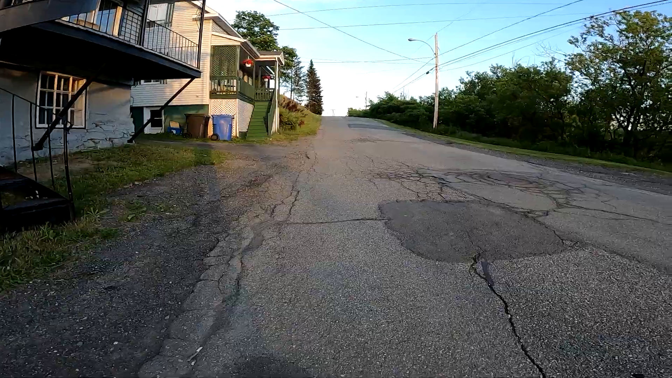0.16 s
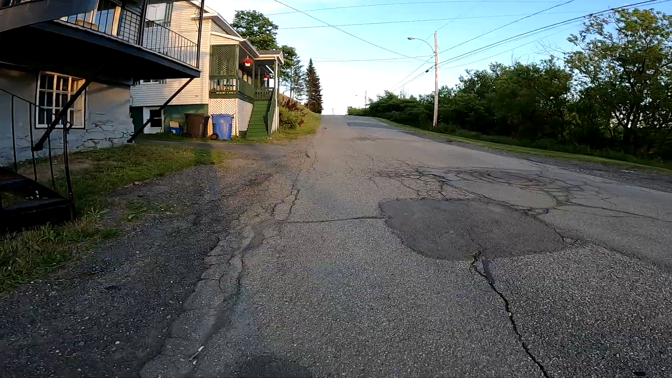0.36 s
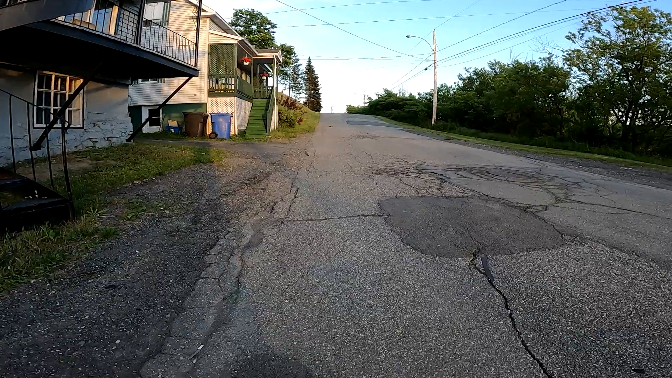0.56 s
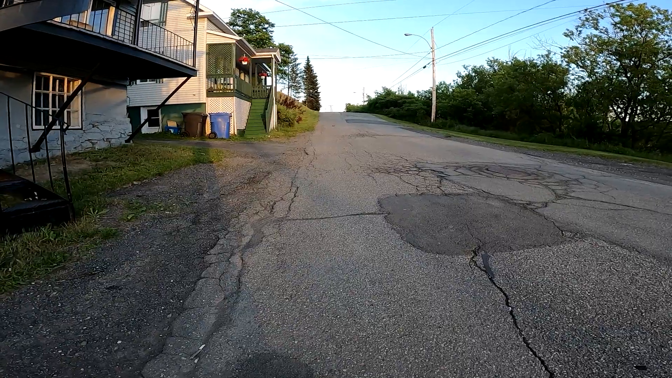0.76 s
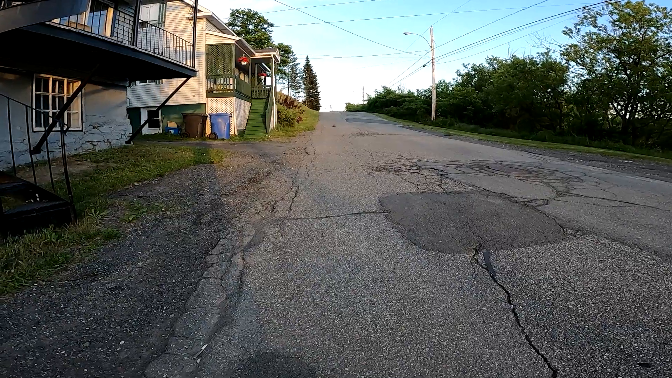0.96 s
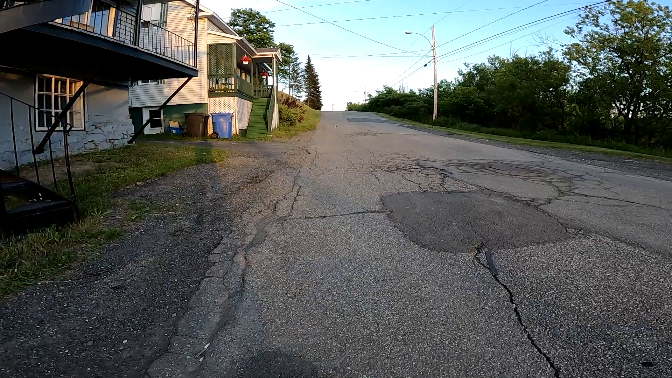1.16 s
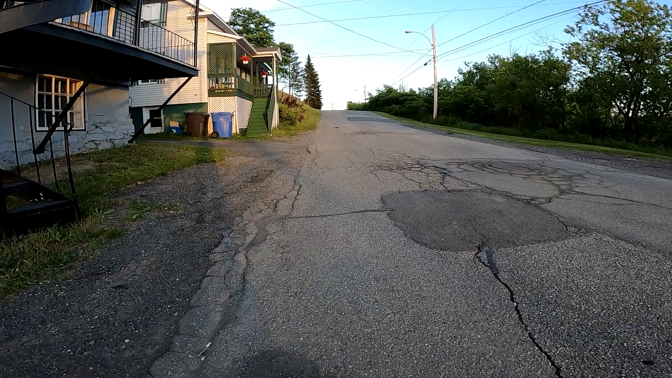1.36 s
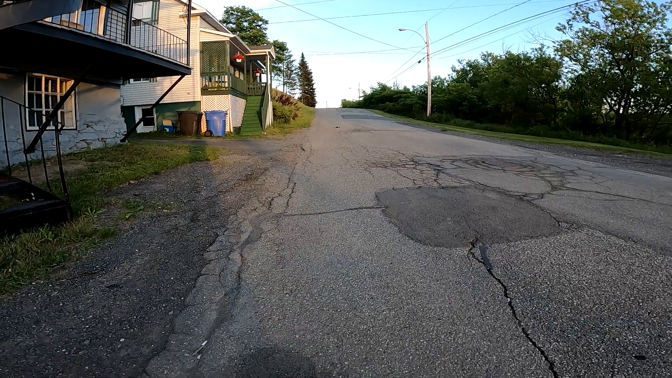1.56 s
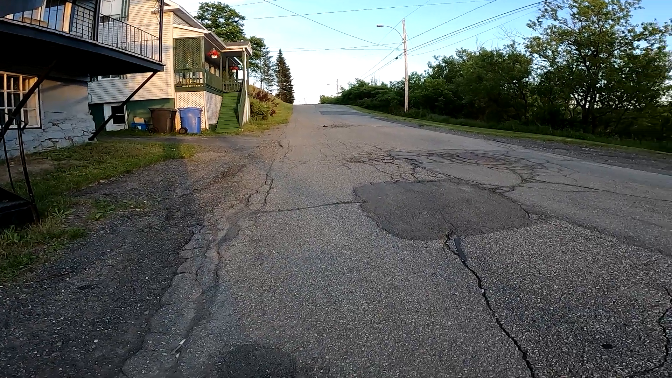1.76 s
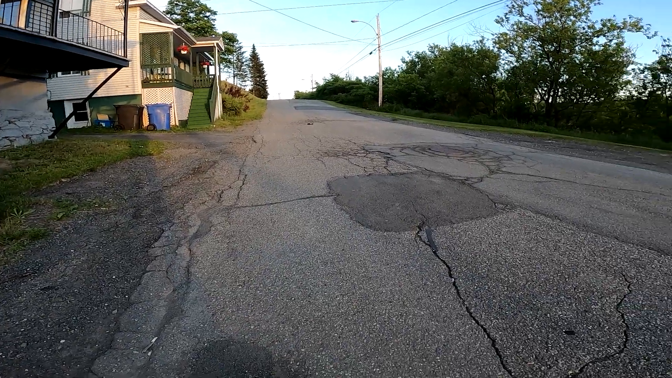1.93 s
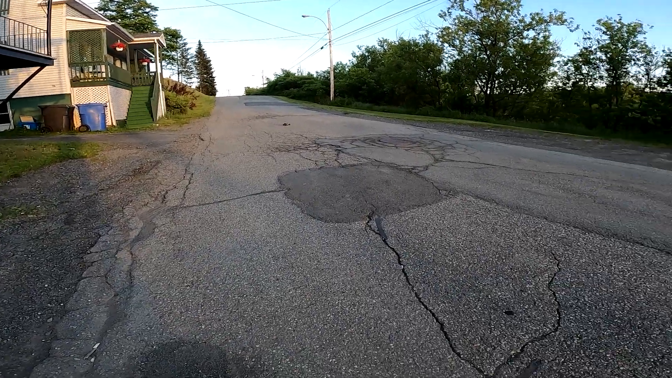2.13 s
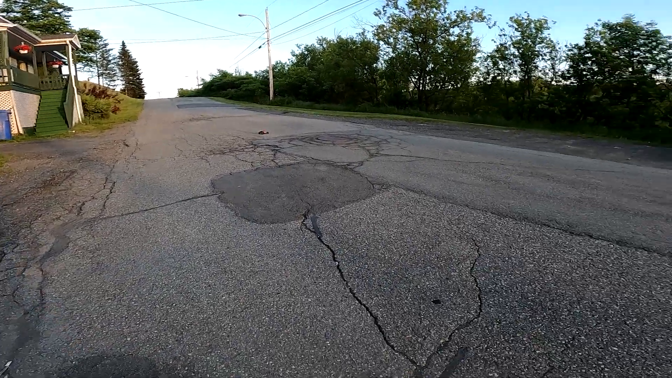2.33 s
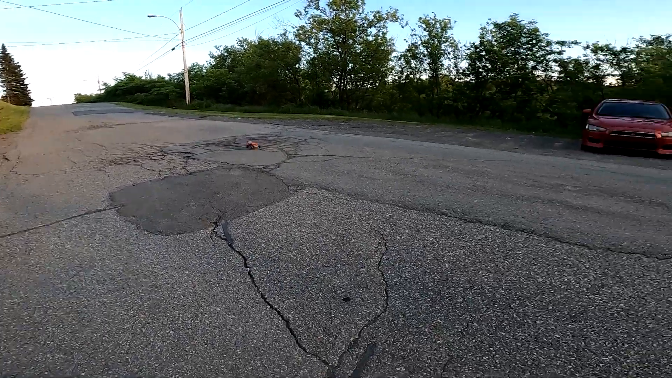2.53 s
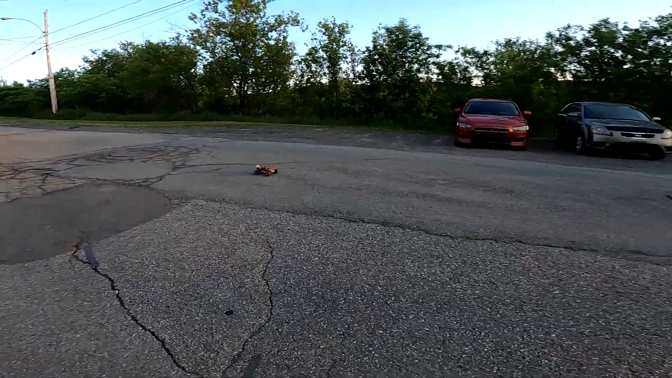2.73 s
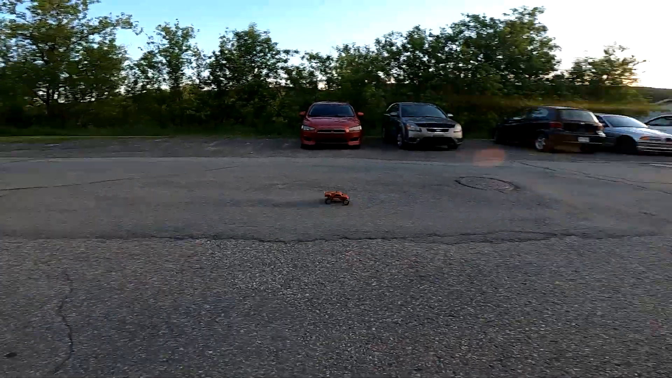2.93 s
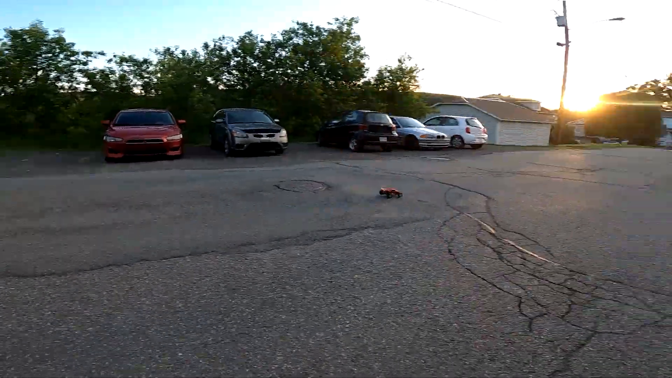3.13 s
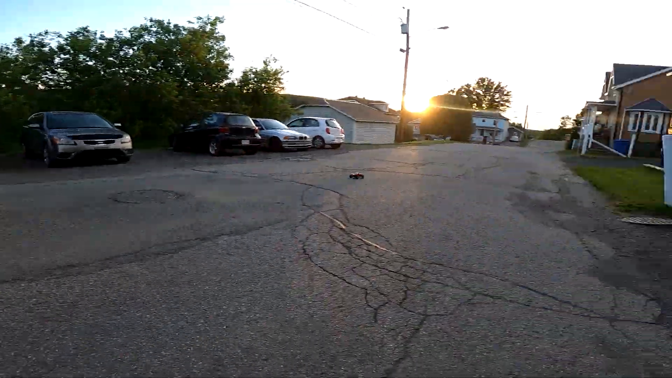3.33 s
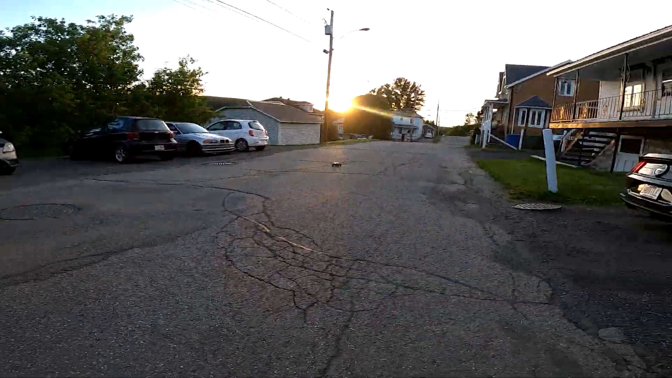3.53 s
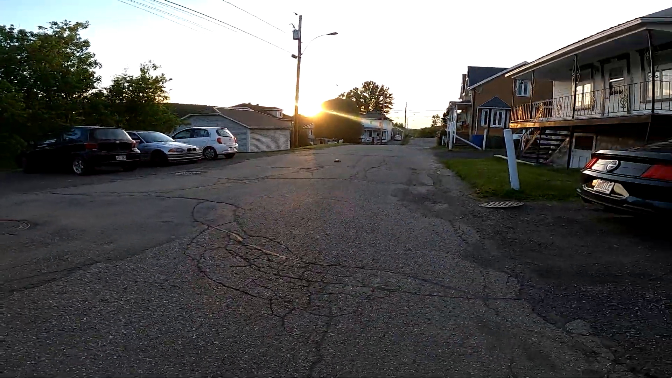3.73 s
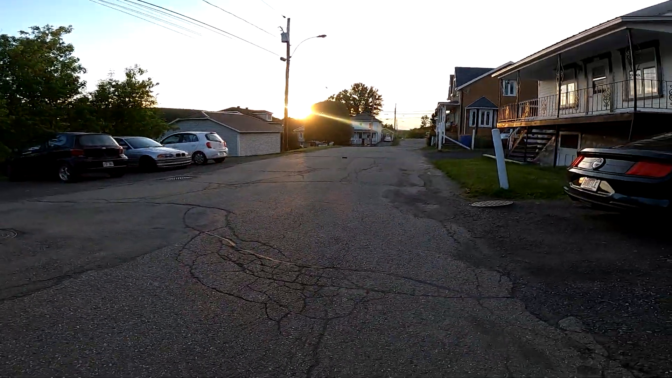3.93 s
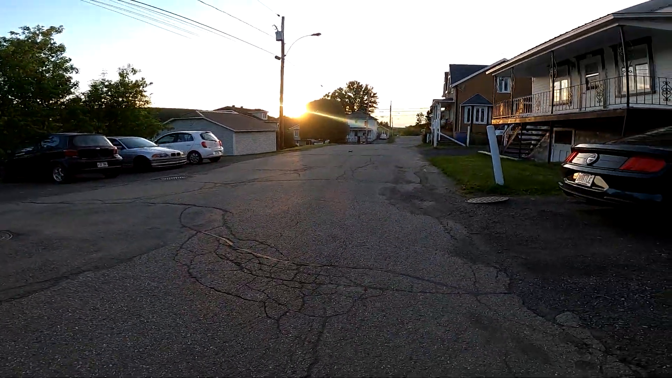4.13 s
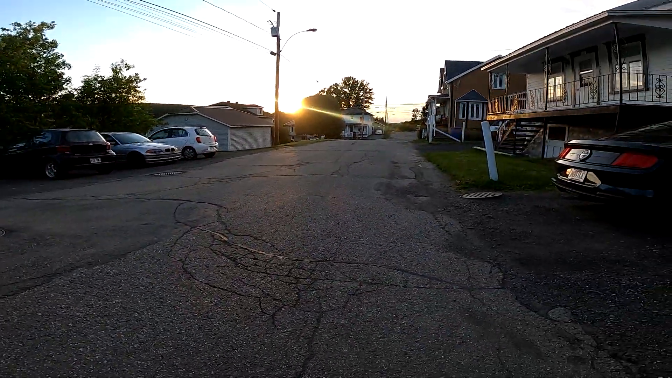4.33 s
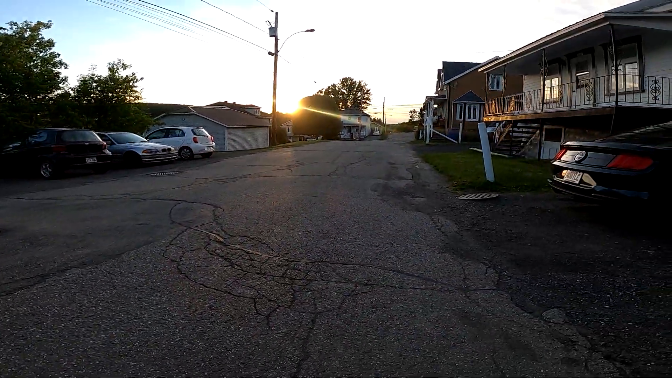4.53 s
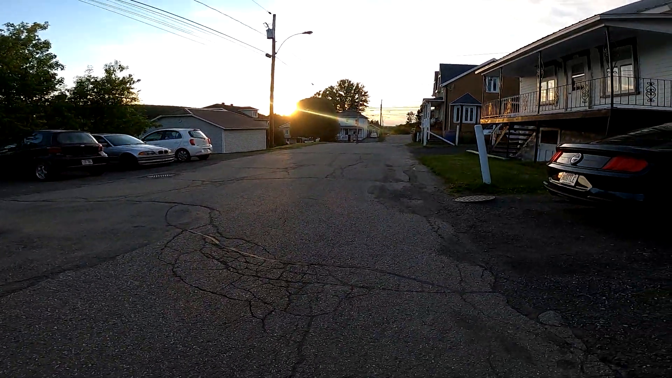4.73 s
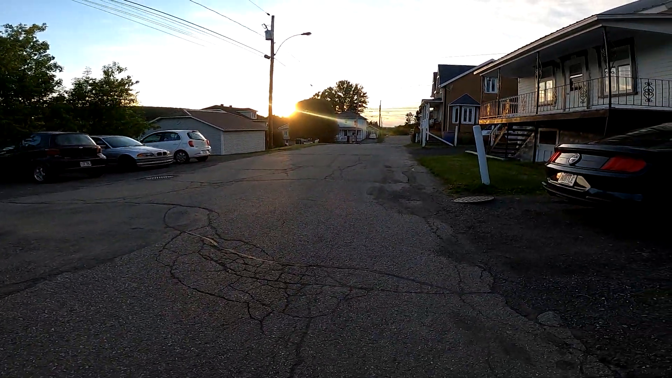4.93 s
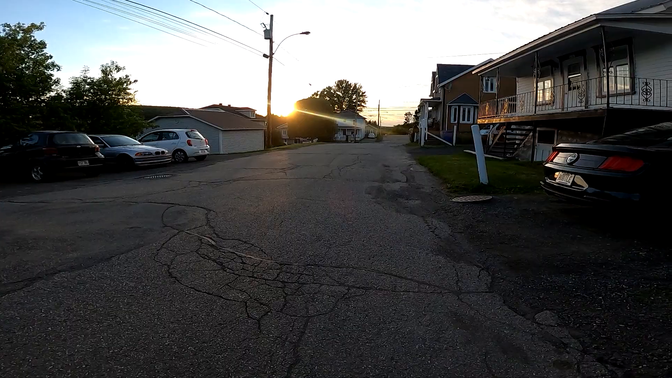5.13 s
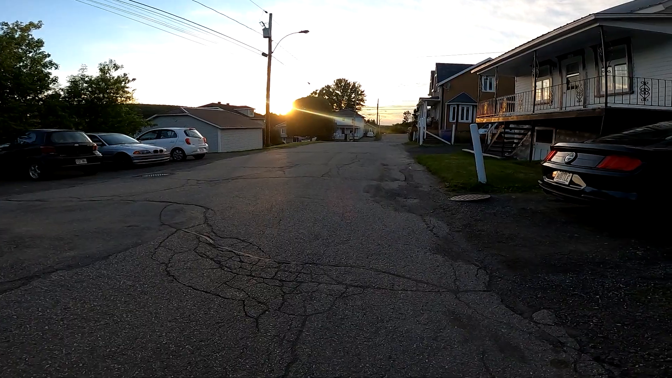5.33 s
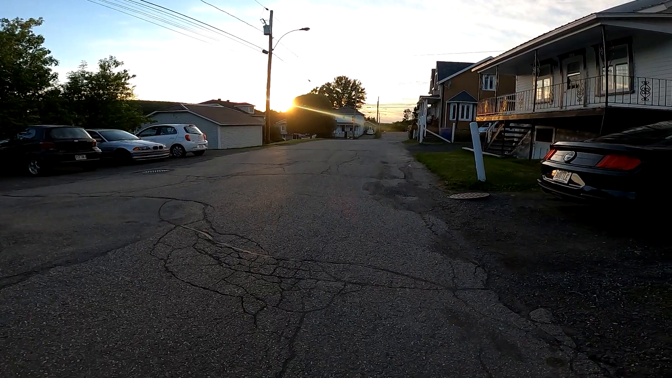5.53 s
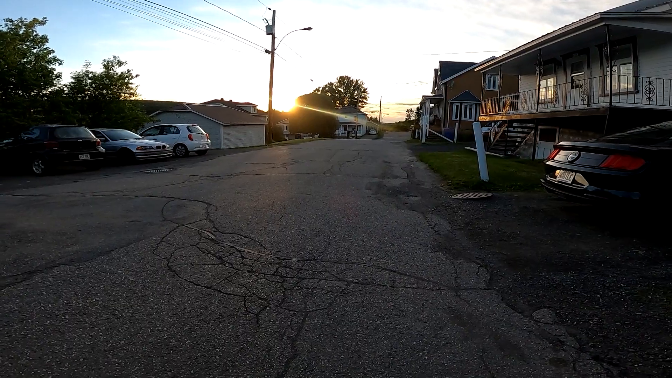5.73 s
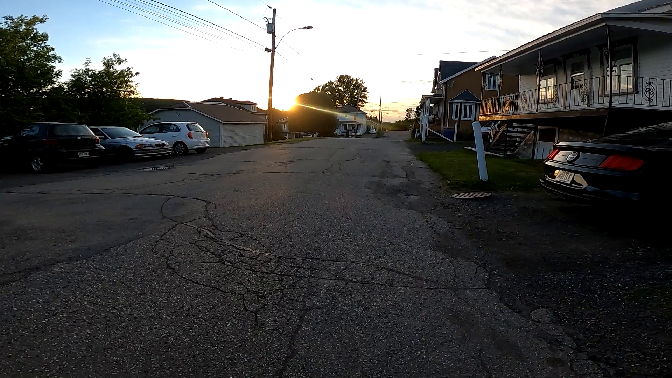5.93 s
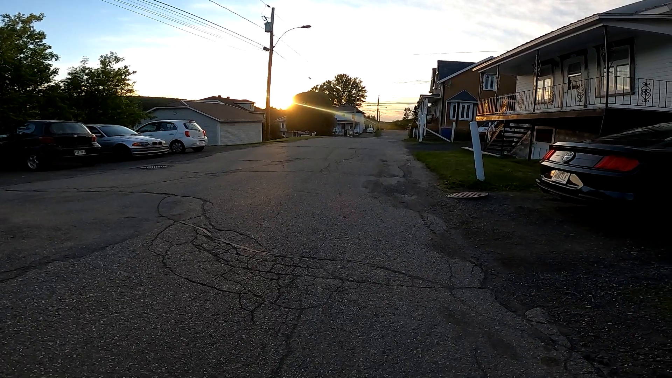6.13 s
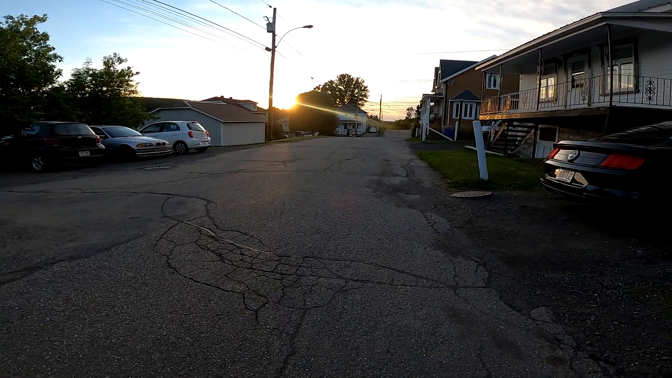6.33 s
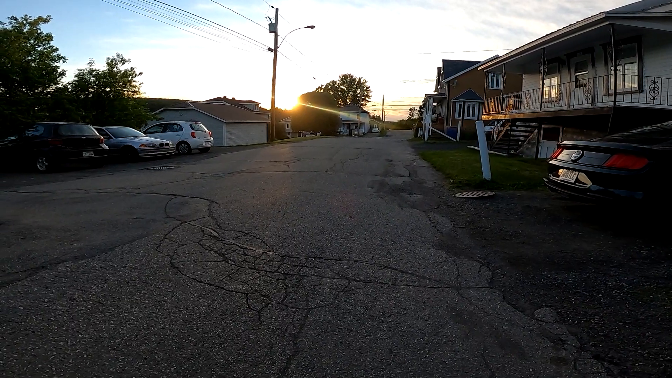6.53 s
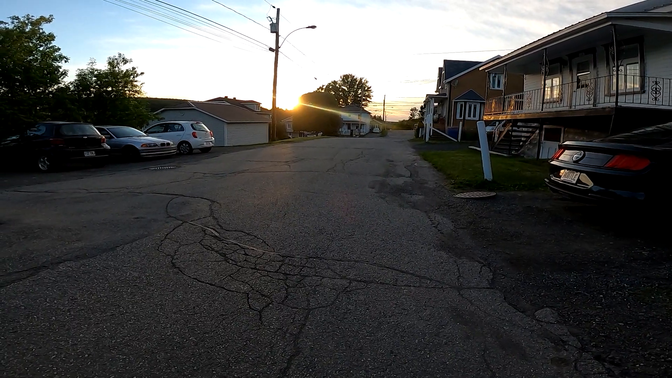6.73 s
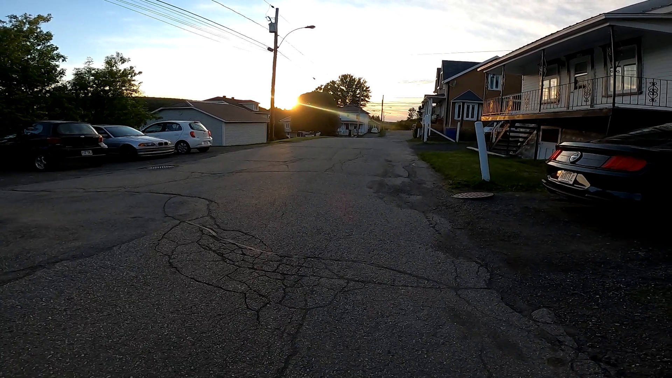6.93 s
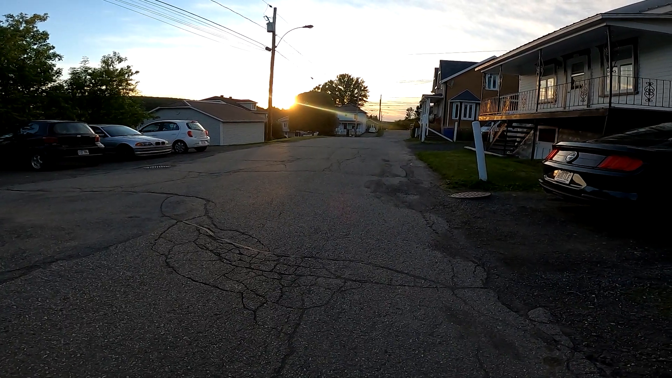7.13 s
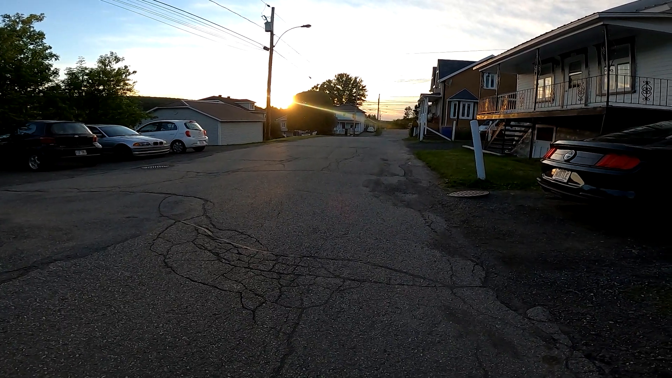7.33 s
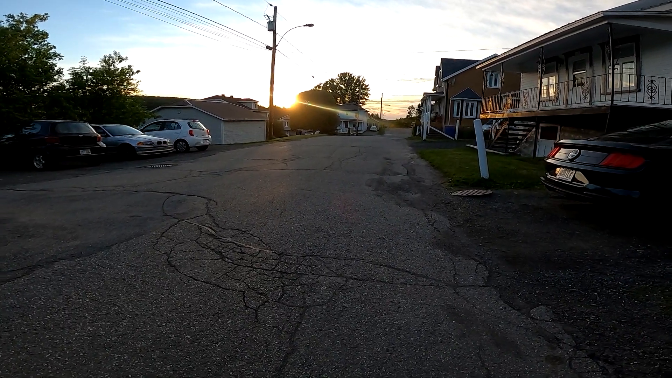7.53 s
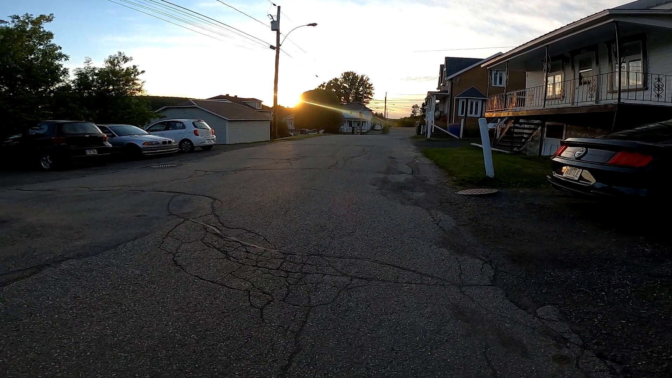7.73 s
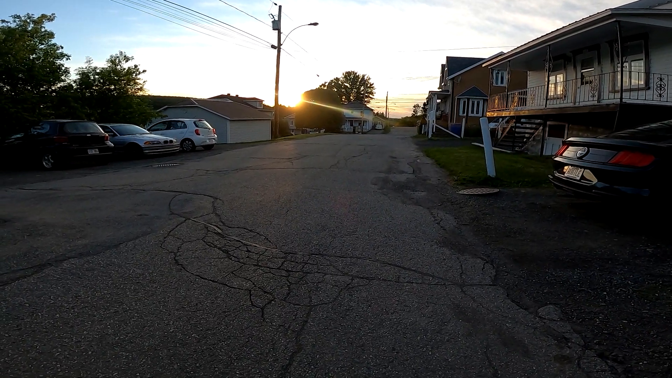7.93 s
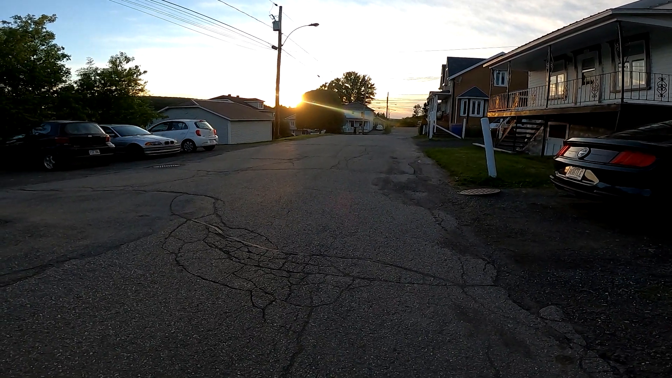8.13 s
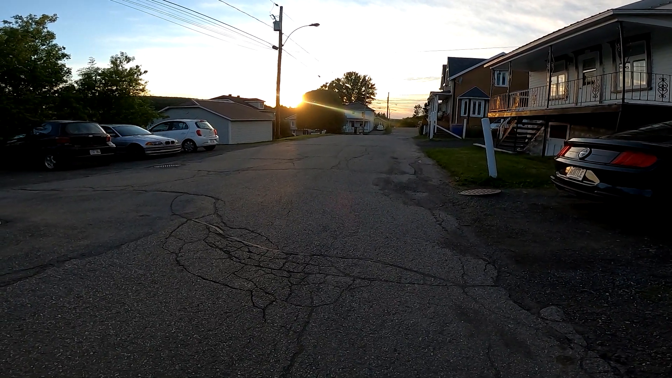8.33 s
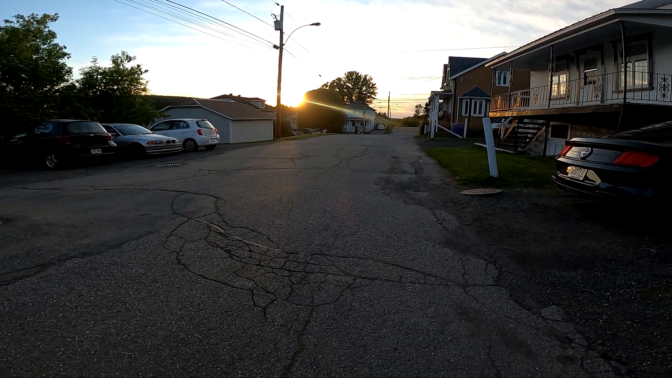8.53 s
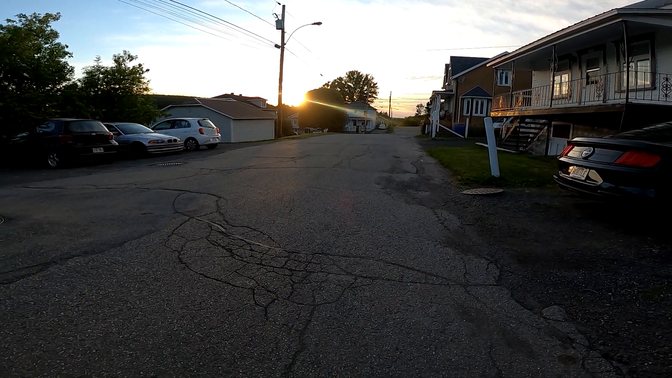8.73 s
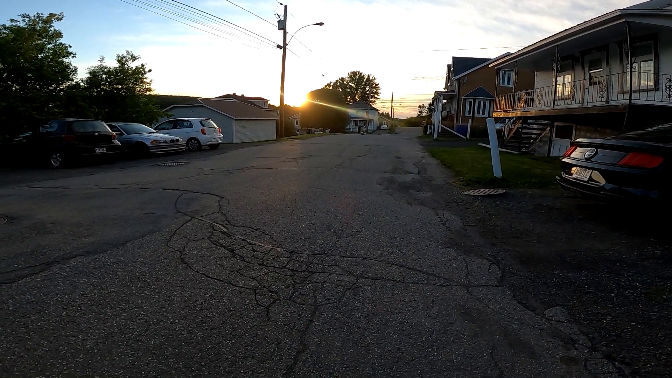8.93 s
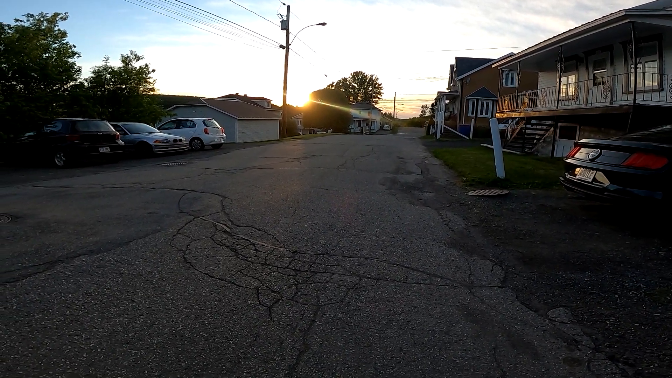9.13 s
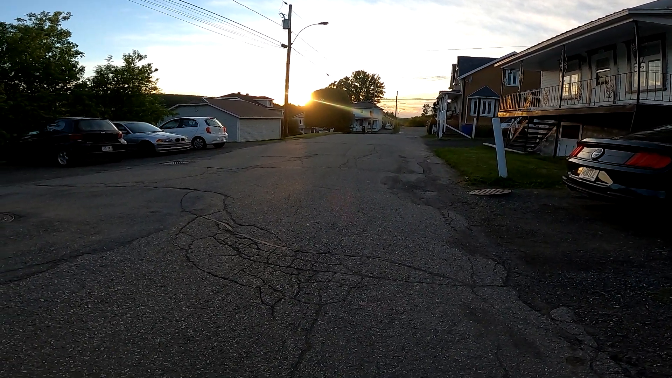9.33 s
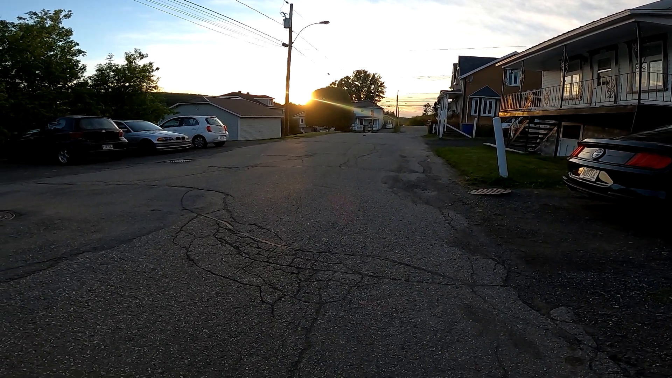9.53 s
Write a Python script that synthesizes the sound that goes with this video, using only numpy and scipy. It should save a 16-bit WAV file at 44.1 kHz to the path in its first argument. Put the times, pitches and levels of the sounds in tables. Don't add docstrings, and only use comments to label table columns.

```python
import sys
import numpy as np
from scipy import signal
from scipy.fft import rfft, irfft, next_fast_len
from scipy.io import wavfile
from scipy.ndimage import uniform_filter1d

SR = 44100
rng = np.random.default_rng(int(sys.argv[2]) if len(sys.argv) > 2 else 0)


def int16_out(signal):
    q = np.round(np.clip(np.atleast_2d(signal).T, -1, 1) * 32767)
    wavfile.write(sys.argv[1], SR, q.astype(np.int16))


def convert_level_to_amplitude(level_db):
    exponent = np.asarray(level_db, float) / 20
    return 10 ** exponent


N = 422919

# t/s, peak level/dB, f/Hz, t60/s
KNOCKS = [(2.781, -24, 1080, 0.044), (2.873, -26, 560, 0.071), (2.949, -22, 791, 0.05),
          (3.264, -11, 732, 0.045), (3.319, -30, 1030, 0.05), (3.469, -27, 977, 0.05),
          (4.359, -35, 1250, 0.05), (4.579, -34, 1370, 0.05), (5.128, -38, 1000, 0.059),
          (8.203, -44, 388, 0.05), (8.759, -50, 533, 0.05)]
# f/Hz, likeness/0..1
NEAR_SAME = [(60, 0.83), (180, 0.82), (550, 0.94), (1650, 0.83), (4970, 0.96), (15000, 0.28)]
# begins, full, fades, ends t/s
IN_VIEW = (1.4, 2.3, 5.3, 6.0)
# begins, full, fades, ends t/s
LEAVING = (2.7, 4.4, 5.8, 6.5)
LEAVING_PAN_DB = -0.9


def drivetrain():
    # factor on its pitch, width/Hz, level/dB
    shell = [(1.0, 170, 0), (.82, 380, -6)]
    gear_case = [(1.0, 215, 0.5), (.87, 600, -7), (1.17, 600, -8)]
    motor_can = [(1.0, 300, 0), (.955, 220, 0), (1.065, 450, -7.5)]
    # t/s, gear case f/Hz, main modes standing out level/dB
    heading = [(0, 3070, -2), (1.8, 3280, 7), (2.02, 3020, 1), (2.2, 3130, 4), (2.3, 3340, 5),
               (2.6, 3260, 8), (2.8, 3330, 6), (2.9, 3000, -2), (3.1, 3120, 7), (3.3, 2880, -4),
               (3.55, 2850, 1), (3.75, 3170, -1.5), (4.3, 3300, 0), (4.5, 3260, -6), (5.1, 3240, -5),
               (5.8, 2950, -2), (7.0, 3200, 1), (9.59, 3220, 0)]
    # begins, full, fades, ends t/s
    rushing = (1.9, 2.45, 2.62, 2.78)
    gear_mean_hz, shell_mean_hz, can_mean_hz = 3250, 1600, 5965
    tilt_db = 7

    hz, t = grid(size=512)
    away = spell(t, LEAVING)
    _, load_db, shell_db = truck(t)
    gear_hz, focus_db = columns(heading, t)
    wander = evened(smooth_twice(rng.standard_normal(len(t)), 12))
    gear_hz = gear_hz * (1 + 0.012 * wander)
    shell_hz = shell_mean_hz * (gear_hz / gear_mean_hz) ** 0.27
    can_hz = can_mean_hz * (gear_hz / gear_mean_hz) ** 0.1
    can_hz = can_hz * (1 - 0.036 * away + 0.035 * spell(t, rushing))
    can_db = -48.5 + 0.97 * (load_db + 40) - spell(t, IN_VIEW)

    parts = [(shell, shell_hz, load_db + shell_db, -62, 0.4),
             (gear_case, gear_hz, load_db, -72, 1),
             (motor_can, can_hz, can_db, -78, 0.3)]
    power = 0
    for modes, pitch, db, street_db, aim in parts:
        rings = []
        for factor, width, mode_db in modes:
            gain = convert_level_to_amplitude(2 * (mode_db + tilt_db * (factor - 1) * away))
            rings.append(gain / (1 + (2 * (hz - factor * pitch) / width) ** 2) ** 2)
        main, *others = rings
        power = power + unit(main * convert_level_to_amplitude(2 * aim * focus_db) + sum(others)) * above(db, street_db)

    small_modes = patches(hz, t, 2, 90)
    uneven_db = 1.86 * patches(hz, t, 5, 20) + 0.53 * small_modes
    power = power * convert_level_to_amplitude(2 * (-1.8 + skips_db(hz, t) + uneven_db))
    teeth = clatter(260, 2.3, 0.0024, steady=2.3)
    return ports(teeth, power, NEAR_SAME, 512, LEAVING_PAN_DB * away)


def tyres():
    # f/Hz, level/dB per Hz
    thump = [(100, -58), (200, -25.5), (330, -6), (480, 0.5), (700, -0.5), (1000, 4.5), (1300, -15.5),
             (1800, -22), (3000, -91.5)]
    roar = [(300, -77), (700, -40), (1200, -8), (2200, -2), (3500, -5.5), (4500, -8), (5200, -14),
            (6500, -15), (7500, -31.5), (12000, -99)]
    grit = [(2000, -78), (5000, -4), (7200, -1), (8700, -5.5), (9500, -11), (11500, -15), (14000, -21.5),
            (15500, -31.5), (17000, -68.5)]

    hz, t = grid(size=512)
    roar_db, seen = truck(t)[0], spell(t, IN_VIEW)
    shake_db, shake_s = 5, 0.024
    shaken = sum(np.exp(-((t - s) / shake_s) ** 2) for s, *_ in KNOCKS)
    near_thump_db = -42.5 + 0.85 * (roar_db + 40.5) + shake_db * shaken
    far_thump_db = -54 + 0.22 * (roar_db + 45.5)
    thump_db = seen * near_thump_db + (1 - seen) * far_thump_db
    grit_db = roar_db - 11.5 - (1 - seen) * (6 - 0.36 * (roar_db + 43))

    power = unit(convert_level_to_amplitude(2 * read(thump, hz))) * above(thump_db, -57.0)
    power += unit(convert_level_to_amplitude(2 * read(roar, hz))) * above(roar_db, -70.0) * convert_level_to_amplitude(2 * 4.83)
    power += unit(convert_level_to_amplitude(2 * read(grit, hz))) * above(grit_db, -96.5) * convert_level_to_amplitude(2 * 4.0)
    jolts = evened(uniform_filter1d(rng.standard_normal(len(t)), 14))
    uneven_db = 1.2 * patches(hz, t, 8, 16) + 2.0 * patches(hz, t, 2, 70) + 0.6 * jolts
    power *= convert_level_to_amplitude(2 * (skips_db(hz, t) + uneven_db))
    stones = clatter(600, 0.92, 0.00053, steady=2.3)
    return ports(stones, power, NEAR_SAME, 512, LEAVING_PAN_DB * spell(t, LEAVING))


def knocks():
    out, t = np.zeros(N), np.arange(4000) / SR
    puffs = rng.standard_normal((len(KNOCKS), 4000))
    for (s, db, hz, t60), puff in zip(KNOCKS, puffs):
        ring = evened(resonate(resonate(puff, hz, 800), hz, 800))
        rise = np.minimum(t / 0.006, 1)
        out[round(s * SR):][:4000] += ring * convert_level_to_amplitude(db - 3 - 60 * t / t60) * rise
    return out


def whistle():
    # t/s, length/s, climb to the ceiling/s, bend of the climb, level/dB
    starts = [
        (.11, 1.19, .405, 1.75, -54.5),
        (6.565, .14, .2, 3, -48),
        (7.745, .3, .354, 3.2, -53),
    ]
    # f/Hz, level/dB
    casing = [(2900, -1), (3250, -2), (4050, -7), (4700, -22), (6030, -6), (6800, -14), (9000, -13),
              (9600, -34)]
    idle_hz, ceiling_hz, settle_hz, settle_s = 2945, 6030, 120, 0.012
    rise_s, fall_s, fade_db_per_s, octave_db = 0.04, 0.04, 6, -18

    out = np.zeros(N)
    for start, length, climb, bend, db in starts:
        u = np.arange(round(length * SR)) / SR
        hz = idle_hz + settle_hz * np.exp(-u / settle_s)
        hz = hz + (ceiling_hz - idle_hz) * np.minimum(u / climb, 1) ** bend
        waver = evened(smooth_twice(rng.standard_normal((2, len(u))), 200))
        turn = 2 * np.pi * np.cumsum(hz * (1 + 0.007 * waver[0])) / SR
        tone = convert_level_to_amplitude(read(casing, hz)) * np.sin(turn)
        tone += convert_level_to_amplitude(octave_db + read(casing, 2 * hz)) * np.sin(2 * turn)
        shape = np.clip(np.minimum(u / rise_s, (length - u) / fall_s), 0, 1)
        level = np.sqrt(2) * convert_level_to_amplitude(db - fade_db_per_s * u + 3.5 * waver[1])
        out[round(start * SR):][:len(u)] = level * tone * shape
    return out


def truck(t):
    # t/s, rolling level/dB, motor load level/dB, shell turned to us level/dB
    run = [(0, -69.5, -82, 5), (.16, -68, -65, 13), (.6, -58, -55, 6.5), (1.3, -51, -49.5, -4),
           (1.43, -47.5, -46, -2), (2.25, -41.5, -29.5, -2.5), (2.6, -37, -24.5, -8.5),
           (3.08, -32.5, -25.5, 2.5), (3.5, -36.5, -25, -7.5), (4.33, -43, -35, -3.5),
           (4.4, -47.5, -38.5, -6.5), (5.06, -52.5, -42.5, -8), (5.13, -54.5, -51.5, -5),
           (5.6, -61, -59, 6.5), (6.5, -65.5, -71, 7), (7.72, -73, -75, -3.5), (7.95, -64.5, -60.5, 2),
           (9.59, -45.5, -43.5, -17)]
    # start t/s, end t/s, rolling level/dB, load level/dB, shell level/dB
    throttle = [
        (2.671, 2.771, -5, -7.5, 2.5),
        (2.853, 2.993, -2.5, -9.5, 6),
        (3.15, 3.453, -2.5, -10, 5.5),
        (5.908, 6.55, -3, -1.5, 2),
        (6.606, 7.026, 7, 16, 4.5),
        (8.15, 8.494, -2, -4, 3.5),
        (8.578, 9.188, -1, -2, 2),
    ]
    edge = 0.034
    moves = 0
    for a, b, *db in throttle:
        moves = moves + np.outer(db, spell(t, [a - edge, a + edge, b - edge, b + edge]))
    return np.array(columns(run, t)) + moves


def skips_db(hz, t):
    # t/s, length/s, depth level/dB
    dips = [
        (5.095, .02, 7),
        (5.18, .02, 12),
        (5.275, .032, 16),
        (5.375, .032, 14),
        (5.47, .018, 6),
        (5.585, .02, 4),
    ]
    depth = sum(db * np.exp(-((t - s) / length) ** 2) for s, length, db in dips)
    return -np.clip(hz / 7000, 0.15, 1.2) * depth


def wind():
    # f/Hz, level/dB per Hz
    push_spectrum = [(10, 2), (25, 8.5), (60, 7), (100, -3.5), (200, -20.5), (400, -49), (1000, -120)]
    # t/s, half length/s, level/dB, left-right level/dB
    gusts = [(0.134, .08, -34, 15), (2.5, 0.14, -46, -22), (3.04, 0.19, -28.5, 5), (3.395, 0.18, -39.5, 6),
             (7.296, .4, -50, -5), (7.91, 0.17, -41, 0), (8.13, 0.22, -36, 0), (8.398, .15, -40, -1),
             (8.86, 0.044, -38, -1), (9.206, 0.043, -28, -1), (9.6, 0.16, -39.5, -6)]
    # t/s, peak level/dB, f/Hz, left-right level/dB
    buffets = [(0.126, -29, 45.3, 10.5), (2.431, -30.5, 40, -12), (2.584, -26.5, 55, -7),
               (2.632, -30, 50, -8), (2.924, -29, 49.7, -16), (2.946, -27.5, 54, 22),
               (2.999, -26, 73.4, 21), (3.085, -21.5, 61.7, 26.5), (3.104, -19, 59.6, 4),
               (3.121, -22, 73, 18), (3.214, -20, 57, 15), (7.913, -28, 49.5, -12), (8.08, -30, 49.3, 2),
               (8.113, -25.5, 50.3, 23), (8.209, -27, 48.6, -12), (8.411, -28.5, 39.6, 13),
               (9.191, -28.5, 40, -6)]
    breeze_db = -58

    t, sides = np.arange(0, N, 64) / SR, np.array([[1], [-1]])
    power = convert_level_to_amplitude(2 * breeze_db)
    for s, half, db, pan_db in gusts:
        power = power + convert_level_to_amplitude(2 * db + sides * pan_db) * np.exp(-2 * ((t - s) / half) ** 2)
    level = np.sqrt(np.repeat(power, 64, axis=1)[:, :N])

    size = next_fast_len(N)
    colour = convert_level_to_amplitude(read(push_spectrum, np.fft.rfftfreq(size, 1 / SR)))
    push = irfft(rfft(rng.standard_normal((2, size))) * colour, size)[:, :N]
    lumps = evened(smooth_twice(rng.standard_normal((2, N)), 1500))
    out = evened(push * convert_level_to_amplitude(1.1 * lumps)) * level
    for s, peak_db, hz, side_db in buffets:
        cycles = np.arange(-2000, 2000) / SR * hz
        shove = -(np.sin(2 * np.pi * cycles) + 0.48 * np.sin(2 * np.pi * 2.85 * cycles))
        shove = shove * np.exp(-(cycles / 0.48) ** 2)
        out[:, round(s * SR) - 2000:][:, :4000] += shove * convert_level_to_amplitude(peak_db - 1.5 + sides * side_db / 2)
    return out


def bird():
    # t/s, peak level/dB, f/Hz
    pips = [(5.9294, -70, 4500), (6.0207, -68, 4530), (6.119, -61, 4430), (6.2073, -65, 4570),
            (6.3061, -63, 4440), (6.3994, -66, 4350), (6.5056, -67, 4550), (6.6019, -65, 4460),
            (6.6982, -60, 4400), (6.7974, -60, 4480), (6.8877, -62, 4480), (7.0045, -60, 4390),
            (7.1018, -65, 4380), (7.211, -63, 4370)]
    last_note = 7.385, -56, 2120
    out, t = np.zeros(N), np.arange(900) / SR
    for s, db, hz in pips:
        turn = 2 * np.pi * hz * t * (1.02 - 1.2 * t)
        pip = np.sin(turn) + convert_level_to_amplitude(5) * np.sin(turn / 2)
        out[round(s * SR):][:900] += convert_level_to_amplitude(db - 1.5) * pip * np.hanning(900)
    s, db, hz = last_note
    out[round(s * SR):][:900] += convert_level_to_amplitude(db) * np.sin(2 * np.pi * hz * t) * np.hanning(900)
    echoes = [(0.019, -10), (0.041, -9), (0.062, -11), (0.081, -13)]  # delay/s, level/dB
    return out + sum(convert_level_to_amplitude(db) * np.roll(out, round(s * SR)) for s, db in echoes)


def engines():
    # start t/s, end t/s, first f/Hz, last f/Hz, level/dB
    hums = [(-1.5, 6.5, 142, 141, -44), (1.0, 2.5, 68, 70, -50), (3.4, 5.7, 67, 63, -41.5),
            (6.3, 9.4, 65, 55, -46), (1.1, 2.6, 204, 208, -47), (4.0, 5.8, 206, 194, -49),
            (4.4, 5.2, 230, 220, -50), (5, 7.36, 128, 117, -45.5), (6.9, 10.5, 177, 171, -45.5),
            (3.6, 4.6, 98, 102, -50), (9.1, 10.5, 121, 119, -46), (8.6, 10.5, 142, 142, -50)]
    waver_hz, steadiest_hz = 1.8, 142
    out, slow = np.zeros(N), np.linspace(0, N / SR, num=960)
    chances = rng.standard_normal((len(hums), 2, 960))
    for (t0, t1, first_hz, last_hz, db), chance in zip(hums, chances):
        span = np.arange(max(round(t0 * SR), 0), min(round(t1 * SR), N))
        t = span / SR
        drift, swell = (np.interp(t, slow, evened(c)) for c in uniform_filter1d(chance, 8))
        waver = 0.7 + waver_hz * abs(np.log2(first_hz / steadiest_hz))
        hz = np.interp(t, [t0, t1], [first_hz, last_hz]) + waver * drift
        fade = np.clip(np.minimum(t - t0, t1 - t) / 0.28, 0, 1)
        tone = np.sin(2 * np.pi * np.cumsum(hz) / SR)
        out[span] += np.sqrt(2) * convert_level_to_amplitude(db + 1.53 * swell) * fade * tone
    return out


def town():
    # f/Hz, level/dB per Hz
    wash = [(15, -17.5), (40, -11), (65, -1), (100, -5), (190, -4.5), (250, -12), (330, -23), (480, -23.5),
            (720, -33), (1100, -23.5), (1700, -31), (2500, -41.5), (6000, -58), (9000, -65.5),
            (16000, -110)]
    # f/Hz, likeness/0..1
    far_same = [(60, 0.96), (180, 1), (550, 0.81), (1650, 0.49), (4970, 0.31), (15000, 0.21)]
    hz, t = grid(size=2048)
    power = unit(convert_level_to_amplitude(2 * read(wash, hz))) * convert_level_to_amplitude(2 * (-40 + 1.6 * patches(hz, t, 12, 20)))
    return ports(rng.standard_normal((2, N)), power, far_same, 2048, -1.2)


def evened(x):
    return x / np.sqrt(np.mean(x ** 2) + 1e-20)


def smooth_twice(x, size):
    return uniform_filter1d(uniform_filter1d(x, size), size)


def read(points, hz):
    f, value = np.transpose(points)
    return np.interp(np.log(hz + 1), np.log(f + 1), value)


def columns(rows, t):
    s, *rest = np.transpose(rows)
    return [np.interp(t, s, c) for c in rest]


def spell(t, times):
    return np.interp(t, times, [0, 1, 1, 0])


def above(db, floor_db):
    return np.maximum(convert_level_to_amplitude(2 * db) - convert_level_to_amplitude(2 * floor_db), convert_level_to_amplitude(2 * (db - 8.5)))


def unit(power):
    return power / power.sum(0)


def resonate(x, hz, width):
    turn = np.exp(2j * np.pi * np.cumsum(hz * np.ones(len(x))) / SR)
    r = np.exp(-np.pi * width / SR)
    return 2 * (turn * signal.lfilter([1 - r], [1, -r], x / turn + 1e-18)).real


def grid(size):
    hop = size // 4
    return np.fft.rfftfreq(size, 1 / SR)[:, None], np.arange(-(-N // hop) + 1) * hop / SR


def patches(hz, t, bins, frames):
    chance = rng.standard_normal((len(t), len(hz))).T
    return evened(uniform_filter1d(uniform_filter1d(chance, bins, 0), frames, 1))


def clatter(per_s, spread_db, burst_s, steady):
    strikes = convert_level_to_amplitude(spread_db * np.minimum(rng.exponential(1, N), 4)) * (rng.random(N) < per_s / SR)
    bursts = evened(signal.lfilter([1], [1, -np.exp(-1 / (burst_s * SR))], strikes))
    return evened((steady + bursts) * rng.standard_normal((2, N)))


def ports(drive, power, same, size, pan_db=0):
    lead_s = 3.2e-5
    overlap = 3 * size // 4
    hz, _, z = signal.stft(drive, SR, nperseg=size, noverlap=overlap)
    like = np.clip(read(same, hz), 0, 1)[:, None]
    lead = np.exp(2j * np.pi * hz * lead_s)[:, None]
    left = z[0] * lead * convert_level_to_amplitude(pan_db / 2)
    right = (like * z[0] + np.sqrt(1 - like ** 2) * z[1]) * convert_level_to_amplitude(-pan_db / 2)
    pair = np.array([left, right]) * np.sqrt(power * len(hz))
    return signal.istft(pair, SR, nperseg=size, noverlap=overlap)[1][:, :N]


def scene():
    points = whistle() + knocks() + engines()
    late = np.roll(points, 1)
    birds = bird() * convert_level_to_amplitude(np.array([[0.], [4.]]))
    return drivetrain() + tyres() + np.array([points, late]) + wind() + birds + town()


def low_pass(x):
    return signal.sosfilt(signal.butter(12, 15640, fs=SR, output="sos"), x)


def record(dry):
    return low_pass(dry)


dry = scene()
out = record(dry)
int16_out(out)
```